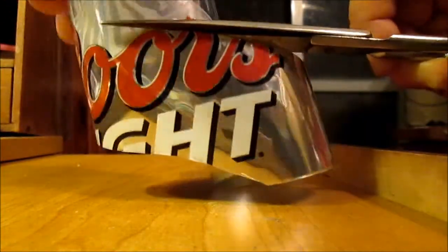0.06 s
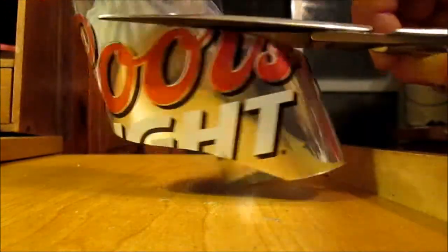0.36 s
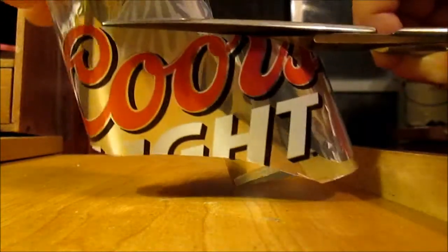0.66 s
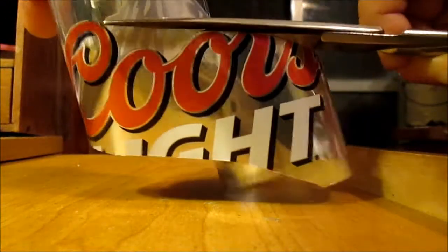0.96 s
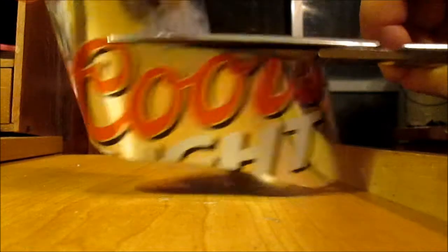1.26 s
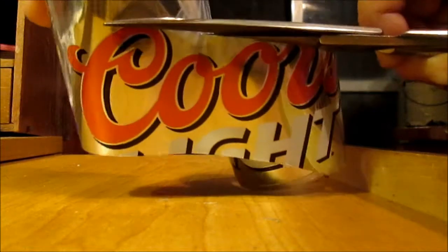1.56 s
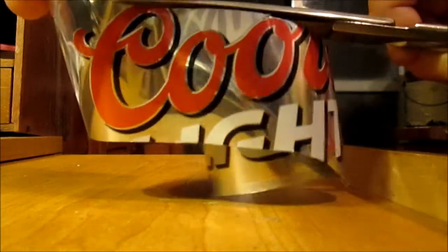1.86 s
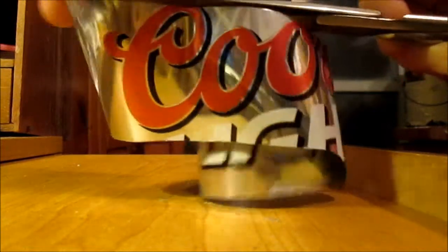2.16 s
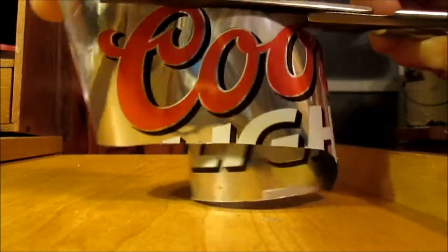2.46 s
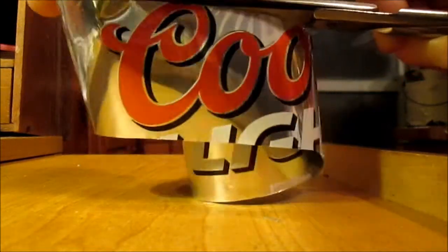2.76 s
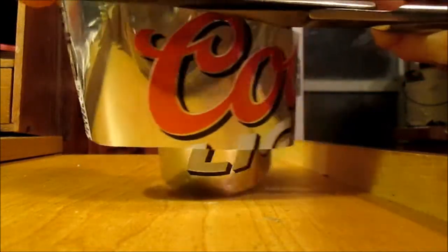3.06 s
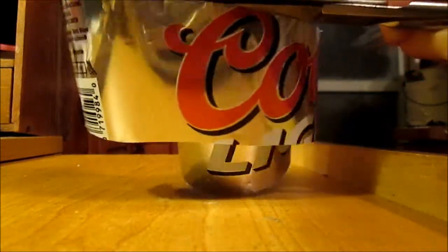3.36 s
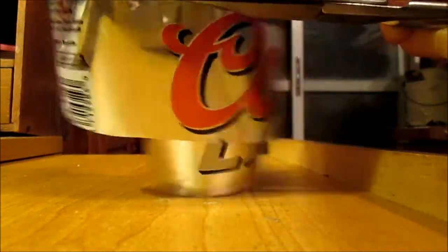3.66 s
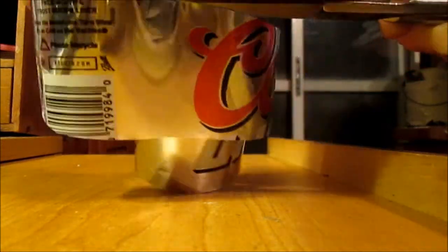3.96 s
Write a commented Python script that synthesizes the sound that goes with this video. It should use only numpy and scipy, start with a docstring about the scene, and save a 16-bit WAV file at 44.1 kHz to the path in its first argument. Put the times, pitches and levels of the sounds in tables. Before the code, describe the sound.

Snips cutting through a thin metal can, close up, rasping and squeaking as it buckles.

```python
"""Metal snips cut a thin aluminum can, close up, on a wooden table in a small room.
The blades scrape and the sheet buckles; from 0.3 s they bite, squeal by stick-slip and ring.
The wall pops at 0.84 s; another bite, squeal and ring follow near 1.25 s. From 1.7 s come quick
bites, then squeals, as the curled edge drags and bumps on the wood. A bite and sharp pops come
near 2.65 s; scraping, dragging and crinkling creases fill the rest."""
import sys
import numpy as np
from scipy import signal
from scipy.fft import rfft, irfft
from scipy.io import wavfile
from scipy.ndimage import uniform_filter1d

SR = 44100
rng = np.random.default_rng(int(sys.argv[2]) if len(sys.argv) > 2 else 0)


def inscribe(sig):
    """Save sig as 16-bit PCM at rate SR to the path in sys.argv[1].

    A 1-D sig is mono; a 2-D sig holds one channel per row.
    Samples are clipped to [-1, 1] before scaling.
    """
    pcm = np.round(np.clip(np.atleast_2d(sig).T, -1, 1) * 32767)
    wavfile.write(sys.argv[1], SR, pcm.astype(np.int16))


N = 176400

# spectrum of the sheet's body: freq_hz, gain_db
BODY_SPECTRUM = [(40, -34.5), (150, -19), (300, -17.5), (480, -12.5), (620, -7), (800, -11.5), (1050, -3.5),
                 (1280, 0.5), (1450, -6), (1650, -5.5), (2050, -12.5), (2500, -23.5), (3500, -23.5),
                 (8000, -69.5)]
# spectrum of the fizz above it: freq_hz, gain_db
TREBLE_SPECTRUM = [(800, -20), (2000, 1.5), (2700, -4.5), (3500, 1), (4300, -2.5), (5200, -4), (6700, 0.5),
                   (8500, -4), (10000, -6.5), (11700, -9), (13000, -15.5), (16000, -22)]
RING_RISE_S, CRACK_RISE_S = .0012, .00042


def amp(db):
    """Decibels to gain."""
    return 10 ** (np.asarray(db) / 20)


def unit(x):
    """Scale to rms 1."""
    return x / np.sqrt(np.mean(x ** 2) + 1e-20)


def clock(length_s):
    """Sample times in seconds."""
    return np.arange(int(length_s * SR)) / SR


def lookup(points, hz):
    """Interpolate a table on a log-frequency axis."""
    freq_hz, value = np.transpose(points)
    return np.interp(np.log(hz + 1), np.log(freq_hz + 1), value)


def add(mix, start_s, sound):
    """Mix a sound in at start_s."""
    part = mix[max(round(start_s * SR), 0):][:len(sound)]
    part += sound[:len(part)]


def colour(x, spectrum, tilt_db_per_oct=0):
    """Filter by a spectrum and a tilt above about 1 kHz; rms 1."""
    hz = np.fft.rfftfreq(len(x), 1 / SR)
    gain = amp(lookup(spectrum, hz) + tilt_db_per_oct * np.log2(1 + hz / 1000))
    return unit(irfft(rfft(x) * gain, len(x)))


def wander(count, span):
    """Random drift of rms 1, smoothed over span samples."""
    return unit(uniform_filter1d(uniform_filter1d(rng.standard_normal(count), span), span))


def ring(t, rise_s, t60_s):
    """Quick rise, exponential decay; peak 1."""
    shape = (1 - np.exp(-(t / rise_s) ** 2)) * np.exp(-np.log(1000) * t / t60_s)
    return shape / shape.max()


def gate(t, length_s, edge_s):
    """Fade in, hold, fade out."""
    return np.clip(np.minimum(t, length_s - t) / edge_s + .5, 0, 1) * np.minimum(2 * t / edge_s, 1)


def slips(count, rate_hz=9000, spread_db=3):
    """Tiny friction slips: random impulses, most weak, a few strong."""
    strength = amp(spread_db * np.minimum(rng.exponential(1, count), 4))
    return strength * rng.choice([-1., 1.], count) * (rng.random(count) < rate_hz / SR)


def fracture(t, crack_share=.041):
    """One sharp crack at the head of a train of slips."""
    train = slips(len(t))
    crack = np.exp(-((t - .001) * SR) ** 2)
    return train + crack_share * np.linalg.norm(train) * crack


def background(level_db=-58.5):
    """Quiet, steady noise, mostly low rumble."""
    # noise spectrum: freq_hz, gain_db
    spectrum = [(20, 1.5), (60, 4), (130, 0.5), (300, 2), (1200, -55.5), (3000, -24), (8000, -37),
                (16000, -61)]
    return amp(level_db) * colour(rng.standard_normal(N), spectrum)


def room(x, gain_db=-14.5, onset_s=.0017):
    """Small room: a short, dense tail whose treble dies first."""
    # reverberation time: freq_hz, t60_s
    decay_times = [(100, .2), (1200, 0.15), (4000, 0.15), (14000, 0.057)]
    hz, t, noise = signal.stft(rng.standard_normal(SR // 2), SR, nperseg=256)
    decay = np.exp(-np.log(1000) * t / lookup(decay_times, hz)[:, None])
    tail = signal.istft(noise * decay, SR, nperseg=256)[1]
    tail *= np.minimum(np.arange(len(tail)) / SR / onset_s, 1)
    return amp(gain_db) * signal.fftconvolve(x, tail / np.linalg.norm(tail))[:N]


def table_contact(drag_width_hz=150):
    """The curled edge judders over the wood and bumps against it."""
    # edge dragging: start_s, length_s, level_db, resonance_hz
    drags = [(.3, 0.095, -38, 220), (.66, 0.11, -73, 200), (1.19, 0.14, -45.5, 180),
             (1.43, 0.05, -45.5, 170), (1.6, 0.32, -56, 190), (1.95, .26, -41, 145),
             (1.96, 0.18, -42.5, 370), (2.55, 0.17, -45.5, 190), (2.86, 0.29, -44, 285),
             (3.25, 0.33, -55, 250), (3.68, .14, -47, 290)]
    # edge bumping: start_s, level_db, pitch_hz
    bumps = [(0.39, -29.5, 105), (0.841, -35.5, 126), (1.795, -30, 173), (1.955, -31, 160),
             (1.987, -24, 150), (2.328, -27.5, 149), (2.677, -48, 89), (2.674, -31, 242),
             (3.226, -39, 47.3)]
    out, t = np.zeros(N), clock(.5)
    hz = np.fft.rfftfreq(len(t), 1 / SR)
    for start_s, length_s, level_db, resonance_hz in drags:
        resonance = 1 / (1 + (2 * (hz - resonance_hz) / drag_width_hz) ** 2)
        judder = unit(irfft(rfft(slips(len(t))) * resonance, len(t)))
        add(out, start_s, amp(level_db) * gate(t, length_s, edge_s=.0083) * judder)
    for start_s, level_db, pitch_hz in bumps:
        thud = ring(t, rise_s=.003, t60_s=.031) * np.sin(2 * np.pi * pitch_hz * t)
        add(out, start_s, amp(level_db) * thud)
    return out


def flex(x, depth_db=3.6):
    """The sheet's resonances swell and fade as it bends."""
    bands = signal.stft(x, nperseg=256)[2]
    drift = uniform_filter1d(rng.standard_normal(bands.shape), size=2, axis=0)  # over frequency
    drift = unit(uniform_filter1d(drift, size=20, axis=1))  # over time
    return signal.istft(bands * unit(amp(depth_db * drift)), nperseg=256)[1][:N]


def can_wall(x, width_hz=26):
    """Scrapes and snaps ring the wall's narrow modes."""
    # wall modes: freq_hz, gain_db
    modes = [(771, -6), (936, -10), (1255, -2), (1620, -2), (2020, -2), (2331, -4), (2645, -1), (2922, -6),
             (3191, -4), (3520, -2), (4741, -4), (5192, -6), (8529, -6)]
    return x + sum(amp(gain_db) * signal.lfilter(*signal.iirpeak(hz, hz / width_hz, SR), x)
                   for hz, gain_db in modes)


def crinkles():
    """A crease gives way in a dying burst of slips."""
    # yielding creases: start_s, body_db, treble_db, t60_s
    creases = [(.012, -25, -36.5, 0.068), (0.07, -24.5, -37.5, 0.12), (0.2692, -29.5, -36, 0.056),
               (.298, -21, -24.5, 0.17), (0.3936, -13.5, -11, 0.049), (.699, -40.5, -53, 0.048),
               (0.708, -30.5, -58, 0.19), (0.725, -30, -43.5, .06), (0.756, -29, -47.5, .04),
               (.842, -28.5, -28.5, 0.25), (0.9645, -33, -40.5, 0.1), (1.1084, -34, -41, 0.3),
               (1.1964, -31.5, -32.5, 0.054), (1.245, -28.5, -23.5, 0.17), (1.436, -46, -52, 0.081),
               (1.483, -29.5, -39.5, 0.1), (1.651, -19.5, -39, 0.12), (2.035, -24.5, -31, 0.17),
               (2.273, -56, -48, 0.15), (2.295, -44, -43.5, 0.11), (2.327, -35, -50, 0.18),
               (2.356, -43, -42.5, 0.075), (2.4064, -56, -47.5, 0.11), (2.4986, -56, -43.5, 0.034),
               (2.5099, -29, -41.5, 0.075), (2.548, -37, -43, 0.11), (2.598, -21, -54, .04),
               (2.607, -23.5, -39.5, 0.18), (2.645, -16.5, -20.5, 0.1), (2.677, -16, -18, 0.064),
               (2.7845, -37, -41.5, 0.13), (2.913, -35, -49, 0.03), (3.126, -36, -71, .05),
               (3.245, -29, -36.5, 0.15), (3.265, -25.5, -38.5, 0.15), (3.3169, -33, -35.5, 0.12),
               (3.329, -37, -34, 0.066), (3.381, -30.5, -42.5, 0.15), (3.414, -32.5, -37.5, 0.12),
               (3.4984, -41, -42.5, 0.21), (3.522, -41, -39, 0.11), (3.6828, -22, -22.5, 0.12),
               (3.8289, -22.5, -26.5, 0.15), (3.9065, -33.5, -47.5, 0.052), (3.932, -36, -54, 0.065)]
    out, t = np.zeros(N), clock(.2)
    for start_s, body_db, treble_db, t60_s in creases:
        burst = fracture(t)
        body = amp(body_db) * colour(burst, BODY_SPECTRUM)
        fizz = amp(treble_db) * colour(burst, TREBLE_SPECTRUM)
        add(out, start_s, ring(t, CRACK_RISE_S, t60_s) * (body + fizz))
    return out


def buckles(wobble=.043):
    """The curved wall flips with a hollow pop whose pitch wobbles as it flexes."""
    # wall flips: start_s, level_db, pitch_hz, t60_s
    pops = [(.009, -12, 1087, 0.039), (0.052, -17, 1120, 0.01), (0.07, -20.5, 1092, 0.049),
            (0.176, -32.5, 1325, 0.059), (.2, -32.5, 1342, 0.1), (.245, -19.5, 1140, 0.021),
            (.269, -21, 1280, .04), (0.299, -14.5, 1132, 0.04), (0.395, -15, 1234, 0.039),
            (.841, -10.5, 1330, 0.041), (0.8446, -8.5, 1046, 0.013), (0.88, -24, 1140, 0.15),
            (0.927, -27.5, 1123, 0.086), (.964, -25, 1098, 0.16), (1.59, -29, 1310, 0.17),
            (1.651, -33, 1180, 0.07), (1.722, -26.5, 1310, 0.1), (1.784, -17, 1100, 0.081),
            (1.823, -22, 1220, 0.022), (2.212, -25, 1269, 0.14), (2.608, -11.5, 950, 0.0091),
            (2.622, -14.5, 980, 0.053), (2.644, -36, 1200, 0.022), (2.6738, -21, 940, 0.013),
            (2.6767, -2.5, 1000, 0.0056), (2.6787, -7, 1634, 0.014), (2.689, -29, 1155, 0.035),
            (2.822, -28, 1260, 0.39), (3.688, -28, 1100, 0.28), (3.83, -19, 1286, .04),
            (3.839, -22.5, 1697, .06), (3.851, -27.5, 1410, 0.17)]
    out, t = np.zeros(N), clock(.2)
    for start_s, level_db, pitch_hz, t60_s in pops:
        phase = 2 * np.pi * np.cumsum(pitch_hz * (1 + wobble * wander(len(t), span=60))) / SR
        add(out, start_s, amp(level_db) * ring(t, RING_RISE_S, t60_s) * np.sin(phase))
    return out


def blade_ring(waver_db=4, waver_rad=.7):
    """The steel blades ring after a hard stroke, wavering as they rub."""
    # blade modes: freq_hz, level_db, t60_s
    modes = [(1680, -13.5, 0.97), (2170, -29.5, .25), (2070, 5.5, 0.45), (3100, -15.5, 0.24),
             (3560, -24.5, 0.093), (4720, -32.5, .25), (5534, -22.5, .15)]
    # knocks on the blades: start_s, gain_db
    knocks = [(.395, -39.5), (1.272, -37)]
    out, t = np.zeros(N), clock(.6)
    ringing = np.zeros(len(t))
    for hz, level_db, t60_s in modes:
        envelope = amp(level_db + waver_db * wander(len(t), span=450)) * ring(t, RING_RISE_S, t60_s)
        ringing += envelope * np.sin(2 * np.pi * hz * t + waver_rad * wander(len(t), span=350))
    for start_s, gain_db in knocks:
        add(out, start_s, amp(gain_db) * ringing)
    return out


def scrape(stick_db=2.5, body_gain_db=-1, treble_gain_db=-3.5):
    """Uneven blade friction shakes the sheet's body and fizzes above it."""
    # friction envelopes, one list per stroke: time_s, body_db, treble_db
    strokes = [
        [(0.0, -26.5, -36), (0.128, -55, -61.5), (0.24, -40, -41), (0.29, -40, -54)],
        [(0.29, -42, -48), (0.36, -24, -28), (0.508, -60, -54.5), (0.67, -69, -74)],
        [(0.67, -51, -62), (0.768, -57, -88.5), (0.835, -62, -65.5)],
        [(0.87, -34.5, -62.5), (0.96, -35, -65), (1.074, -66, -80), (1.1, -56, -72.5)],
        [(1.11, -56, -42.5), (1.234, -33, -41.5), (1.34, -47.5, -58), (1.433, -60.5, -64)],
        [(1.445, -38.5, -51), (1.523, -40, -52), (1.57, -44, -65)],
        [(1.59, -36, -38.5), (1.658, -24, -29), (1.766, -36, -42), (1.846, -33.5, -30.5), (1.93, -60, -62)],
        [(1.93, -54.5, -56.5), (2.012, -26, -37), (2.094, -30.5, -35.5), (2.196, -35, -41), (2.326, -47.5, -65),
         (2.47, -47.5, -60)],
        [(2.47, -50, -60), (2.536, -32.5, -61), (2.595, -36.5, -55)],
        [(2.755, -45.5, -44.5), (2.887, -40.5, -41), (3.063, -39, -49), (3.23, -55.5, -64.5)],
        [(3.23, -60, -89), (3.328, -36.5, -50), (3.454, -47.5, -50), (3.6, -44, -53)],
        [(3.6, -44, -47), (3.7, -40.5, -42), (3.766, -38.5, -40), (3.9, -40.5, -55)],
        [(3.915, -70, -93), (3.975, -37, -48.5)],
    ]
    points = np.concatenate(strokes)
    time_s, body_db, treble_db = points[np.argsort(points[:, 0], kind="stable")].T
    t = np.arange(N) / SR
    friction = slips(N) * amp(stick_db * wander(N, span=260))
    body = colour(friction, BODY_SPECTRUM) * amp(body_gain_db + np.interp(t, time_s, body_db))
    fizz = colour(friction, TREBLE_SPECTRUM) * amp(treble_gain_db + np.interp(t, time_s, treble_db))
    return body + fizz


def squeals(jitter=.04, smear_rad=1.1, flutter_db=3):
    """Blade stick-slip locks into a rough gliding tone with a smeared overtone."""
    # stick-slip tones: start_s, length_s, level_db, start_hz, end_hz, overtone_db, roughness
    glides = [(0.354, 0.026, -25.5, 3175, 2865, -5, 0.7), (0.382, 0.011, -14.5, 2620, 2160, -6.5, 1),
              (0.393, 0.023, -11.5, 2150, 2000, -15, .5), (0.413, 0.029, -21, 1624, 1977, -11.5, 1.1),
              (1.21, .022, -35, 2870, 2800, -16, .4), (1.236, 0.029, -20.5, 2330, 2301, -4, 0.2),
              (1.266, 0.016, -13, 2140, 2102, -19.5, 0.42), (1.281, .018, -28, 2850, 2920, -9, 0.54),
              (1.435, 0.019, -35.5, 2290, 2260, -26, 0.9), (1.7785, 0.013, -25, 3550, 3570, -2, 0.8),
              (2.033, 0.03, -19.5, 3600, 3360, -17, 1.23), (2.034, 0.022, -21, 2680, 2670, -7.5, 0.6),
              (2.088, .012, -33, 3050, 3060, -22, 1), (2.103, 0.027, -22, 3164, 3177, -12.5, 0.9),
              (2.127, 0.04, -21.5, 3200, 3230, -38, 0)]
    out, t = np.zeros(N), clock(.1)
    for start_s, length_s, level_db, start_hz, end_hz, overtone_db, roughness in glides:
        pitch_hz = np.interp(t, [0, length_s], [start_hz, end_hz])
        pitch_hz *= 1 + roughness * jitter * wander(len(t), span=22)
        phase = 2 * np.pi * np.cumsum(pitch_hz) / SR
        smear = roughness * smear_rad * wander(len(t), span=40)
        tone = np.sin(phase) + amp(overtone_db) * np.sin(2 * phase + smear)
        level = amp(level_db + roughness * flutter_db * wander(len(t), span=50))
        add(out, start_s, tone * gate(t, length_s, edge_s=.004) * level)
    return out


def bites(edge_q=7):
    """The cut runs forward in a short tearing rasp, bright above the edge's lowest resonance."""
    # advances of the cut: start_s, length_s, level_db, tilt_db_per_oct, release_t60_s, resonance_hz
    cuts = [(0.297, 0.0015, -10.5, 7, 0.036, 6300), (0.381, 0.026, -26, 2.5, 0.18, 2230),
            (1.232, 0.052, -32.5, -0.5, 0.09, 2350), (1.736, 0.0017, -20, 3, 0.037, 3630),
            (1.7792, 0.0055, -17, 0.5, 0.04, 3490), (1.8183, .005, -20.5, 3, 0.028, 3430),
            (1.832, 0.0024, -18, 2.5, 0.027, 4200), (2.031, 0.022, -22, 7.5, 0.028, 3270),
            (2.633, 0.018, -13.5, 3.5, 0.089, 4200)]
    # tearing spectrum: freq_hz, gain_db
    spectrum = [(300, 9.5), (2500, 2), (4500, -0.5), (5700, -2), (7000, 5), (7800, 1), (8700, 2),
                (10000, -2.5), (11400, -4.5), (13000, -13.5), (16000, -18.5)]
    out, t = np.zeros(N), clock(.2)
    hz = np.fft.rfftfreq(len(t), 1 / SR)
    for start_s, length_s, level_db, tilt_db_per_oct, release_t60_s, resonance_hz in cuts:
        attack = np.minimum(t / CRACK_RISE_S, 1)
        release = np.exp(-np.log(1000) * np.maximum(t - length_s, 0) / release_t60_s)
        ratio = hz / resonance_hz
        edge_highpass = ratio ** 2 / (1 - ratio ** 2 + 1j * ratio / edge_q)
        rasp = irfft(rfft(fracture(t) + slips(len(t))) * edge_highpass, len(t))
        add(out, start_s, amp(level_db) * attack * release * colour(rasp, spectrum, tilt_db_per_oct))
    return out


def scene():
    """Close cutting sounds, their reverberation and the background; mono."""
    sheet = can_wall(flex(scrape() + crinkles() + bites()))
    direct = sheet + buckles() + squeals() + blade_ring() + table_contact()
    return (direct + room(direct) + background())[None]


def record(dry):
    """Two narrow microphone notches, overload near full scale, 16 kHz band limit."""
    # microphone notches: freq_hz, width_hz
    notches = [(3950, 200), (7880, 134.5)]
    x = dry
    for hz, width_hz in notches:
        x = signal.lfilter(*signal.iirnotch(hz, hz / width_hz, SR), x)
    lowpass = signal.firwin(255, 16000, window=("kaiser", 9), fs=SR)
    return signal.oaconvolve(np.clip(x, -.9, .9), lowpass[None], "same")


dry = scene()
out = record(dry)
inscribe(out)
```